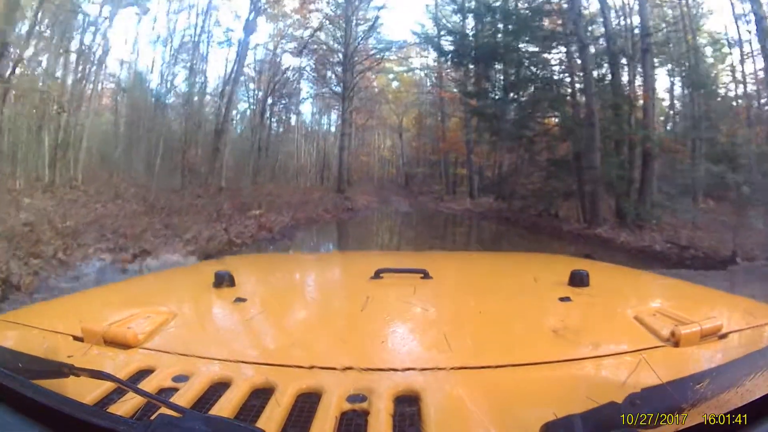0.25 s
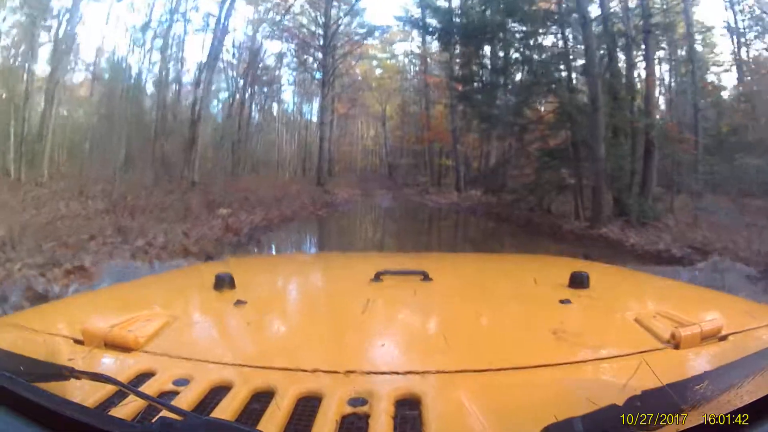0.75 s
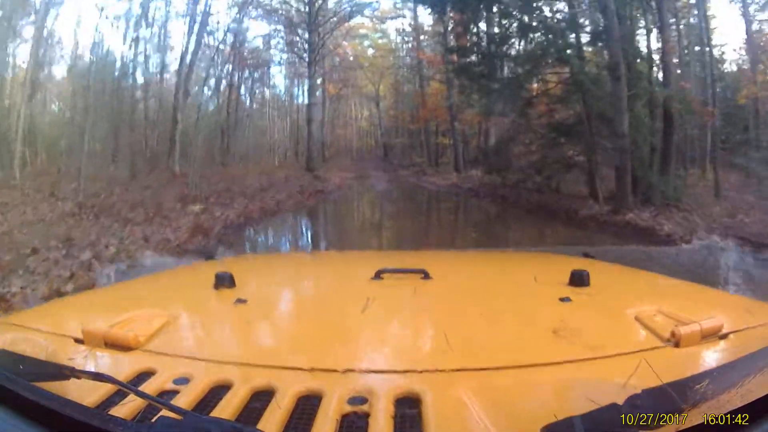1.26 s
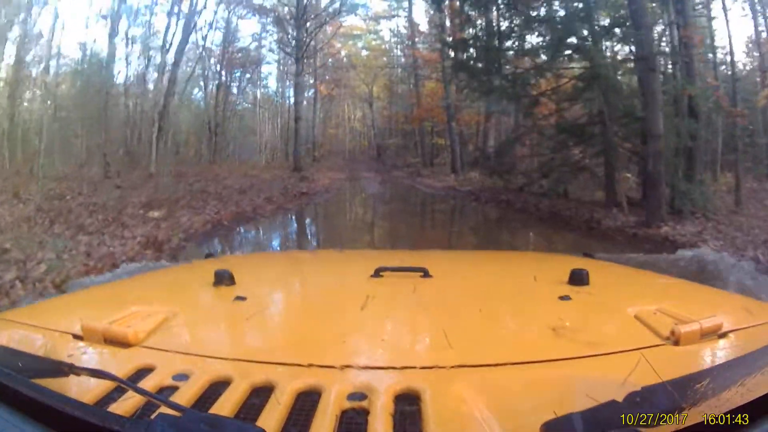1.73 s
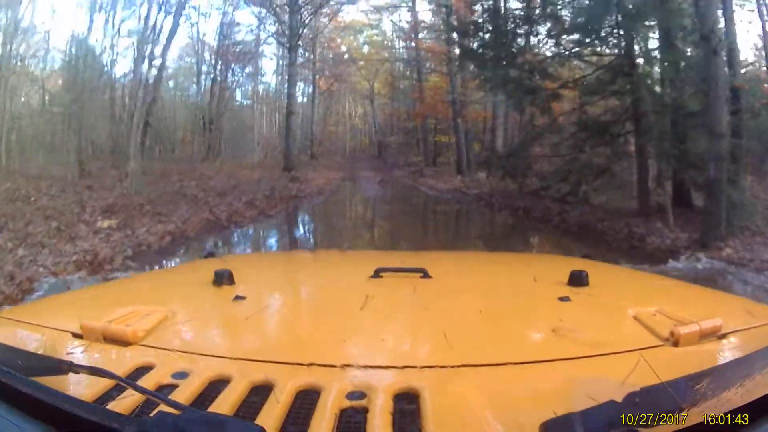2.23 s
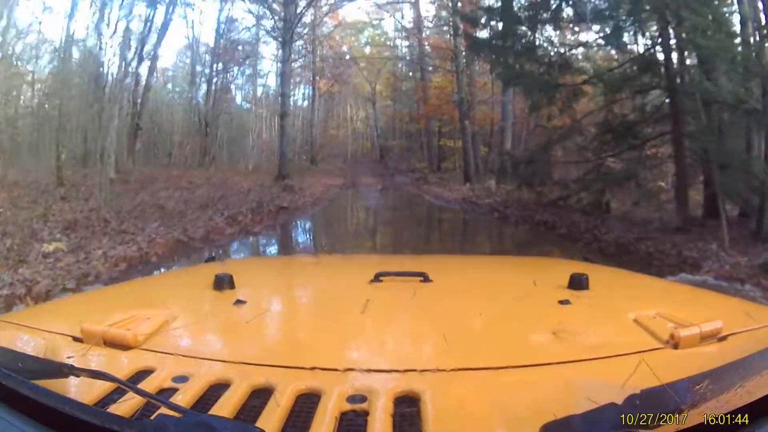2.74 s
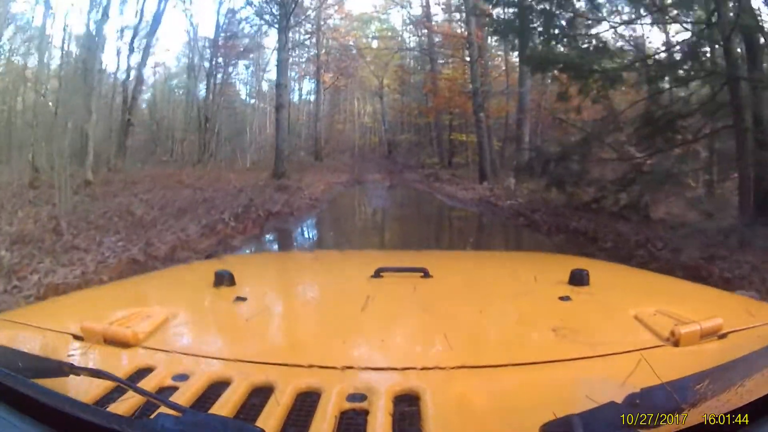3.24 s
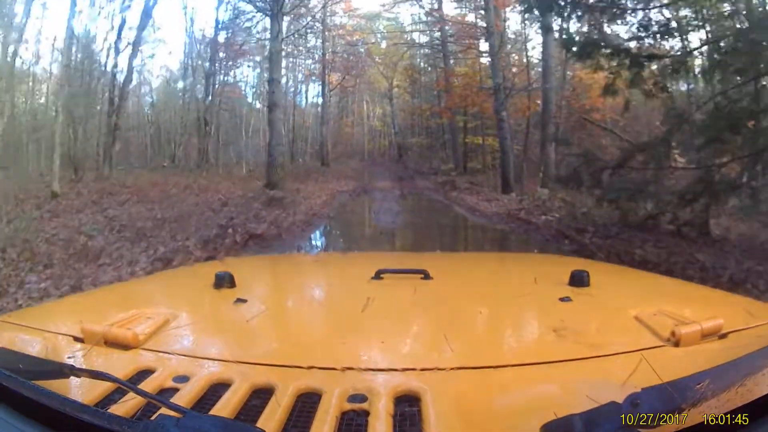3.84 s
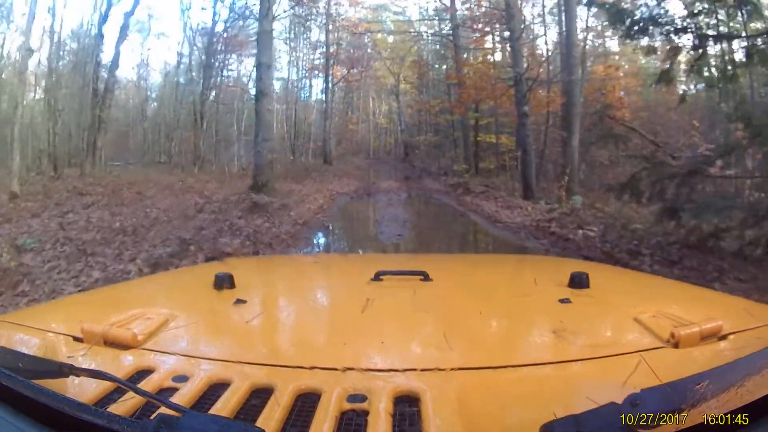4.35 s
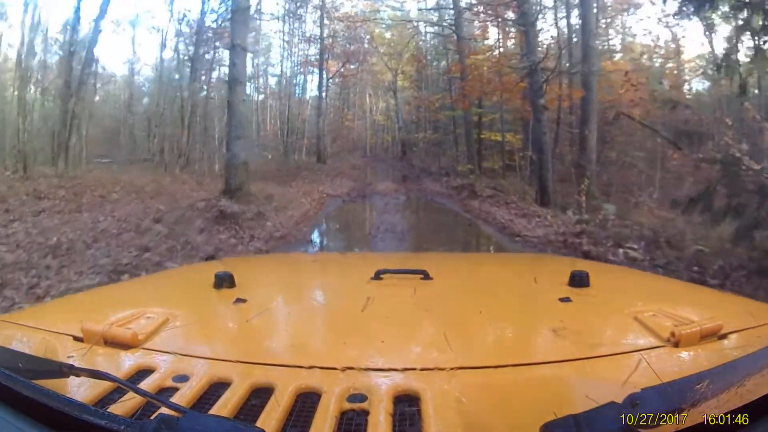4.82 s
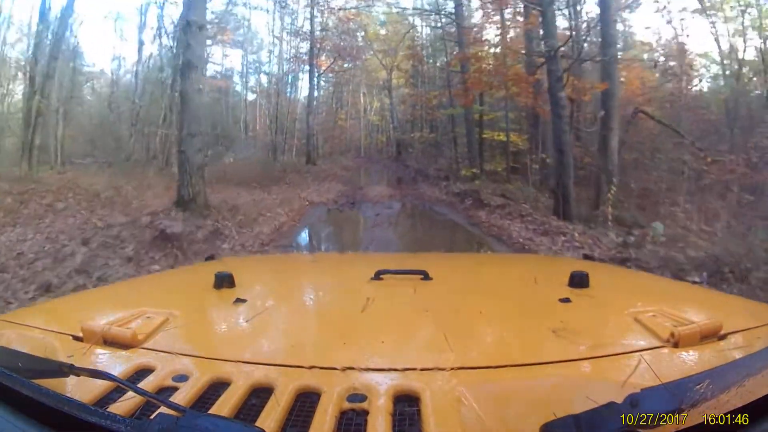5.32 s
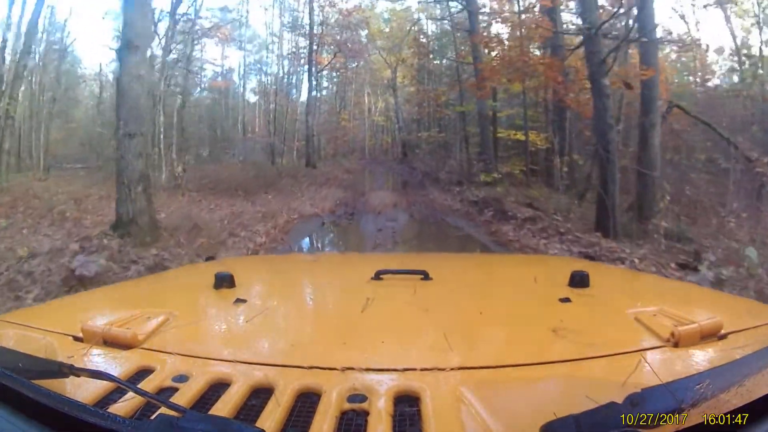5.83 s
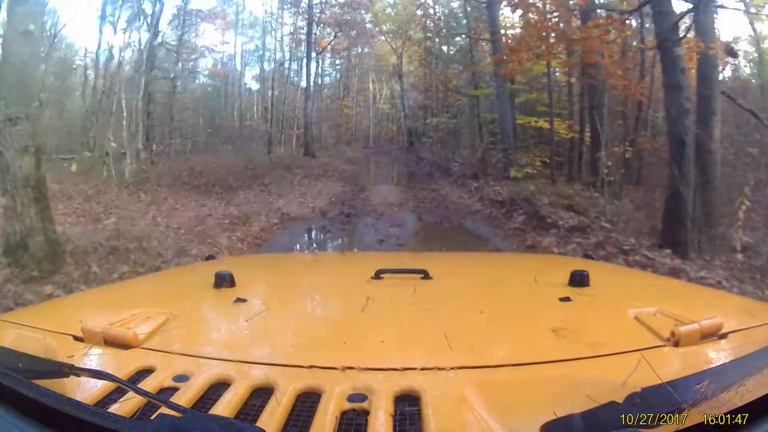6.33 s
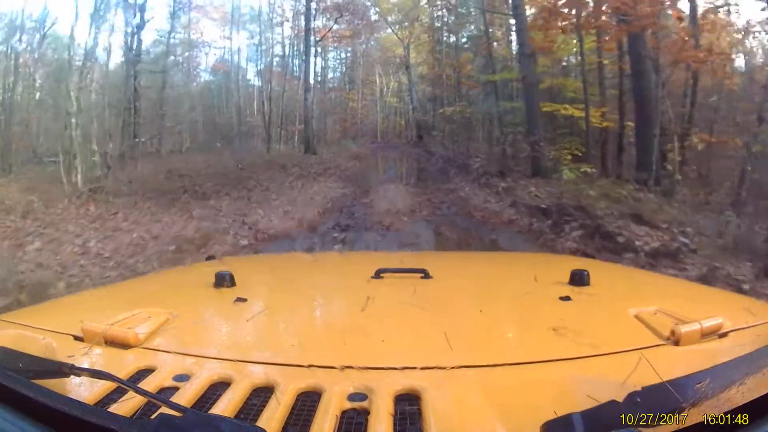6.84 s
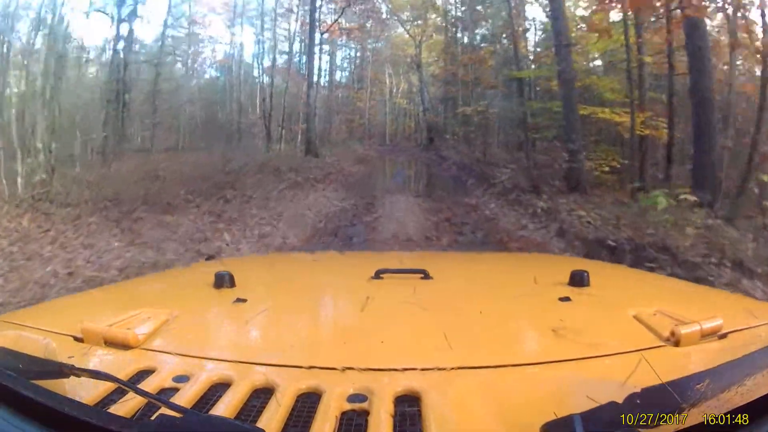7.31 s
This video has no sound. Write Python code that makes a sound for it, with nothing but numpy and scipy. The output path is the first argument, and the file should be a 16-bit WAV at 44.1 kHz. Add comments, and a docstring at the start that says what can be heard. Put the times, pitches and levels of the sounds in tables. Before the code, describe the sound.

An off-road car's engine hums inside the cab while the body shakes and bumps set off close, sharp rattling knocks.

```python
"""Inside an off-road car rolling slowly along a muddy track, the microphone in a small camera hung on
the windscreen. From the start the body shakes, a six-cylinder engine and wet tyres sound through the
cab, and the camera's circuits add hiss and a faint high whine. From 0.2 to 3.4 s ruts rattle the camera
in its mount, right at the microphone. The engine has dropped in pitch by 3.7 s and climbs gently over
smoother ground; from 6.8 s a few more ruts set the camera knocking again."""
import sys
import numpy as np
from scipy import signal
from scipy.fft import rfft, irfft, next_fast_len
from scipy.io import wavfile
from scipy.ndimage import uniform_filter1d

SR = 44100
rng = np.random.default_rng(int(sys.argv[2]) if len(sys.argv) > 2 else 0)


def digitize_waveform(pressure):
    """Quantize a signal to 16-bit integers and store it at the path in sys.argv[1].

    Rows of a 2-D input are taken as channels; values are limited to [-1, 1].
    """
    field = np.atleast_2d(pressure).T
    bounded = np.clip(field, -1, 1)
    quanta = np.round(bounded * 32767).astype(np.int16)
    wavfile.write(sys.argv[1], SR, quanta)


N = 333837
T = np.arange(N) / SR


def gain_of(db):
    """Decibels to amplitude."""
    return 10 ** (np.asarray(db) / 20)


def unit_rms(x):
    """Scales to rms 1."""
    return x / np.sqrt(np.mean(x ** 2) + 1e-20)


def column(rows, index):
    """One column of a timed table, interpolated at every sample."""
    rows = np.array(rows)
    return np.interp(T, rows[:, 0], rows[:, index])


def coloured(spectrum):
    """Noise of rms 1, shaped by points of (frequency [Hz], relative level [dB])."""
    size = next_fast_len(N)
    hz, db = np.transpose(spectrum)
    bins_hz = np.fft.rfftfreq(size, 1 / SR)
    shape_db = np.interp(np.log(bins_hz + 1), np.log(hz + 1), db, left=-90, right=-90)
    return unit_rms(irfft(rfft(rng.standard_normal(size)) * gain_of(shape_db), size)[:N])


def drift(rate_hz):
    """Random wander of rms 1, mostly slower than rate_hz."""
    return coloured([(.2, 0), (rate_hz, -6), (2 * rate_hz, -40)])


def resonate(x, hz, width_hz):
    """A resonance of gain 1: shifts hz (steady or gliding) down to zero, smooths, and shifts back."""
    carrier = np.exp(2j * np.pi * np.cumsum(hz * np.ones(len(x))) / SR)
    pole = np.exp(-np.pi * width_hz / SR)
    return 2 * (carrier * signal.lfilter([1 - pole], [1, -pole], x / carrier)).real


# Ruts under the wheels: (start [s], length [s], shake level [dB], jolt level [dB])
RUTS = [(0.251, 0.29, -24, -26.5), (0.564, 0.19, -19.5, -21), (0.95, 0.091, -21.5, -28.5),
        (1.126, 0.29, -20, -20.5), (1.566, 0.11, -27, -25), (2.004, 0.16, -35, -27),
        (2.202, 0.098, -39, -23), (2.38, 0.12, -36, -26.5), (2.69, 0.14, -21, -28.5),
        (2.92, 0.17, -26.5, -21.5), (3.282, 0.12, -27, -25), (6.786, 0.084, -35, -35.5),
        (7.382, 0.072, -32.5, -32.5), (7.462, 0.18, -35, -23.5)]
# The track between the ruts: (time [s], shake level [dB], jolt level [dB])
TRACK = [(0, -26, -37.5), (.86, -53.5, -55.5), (1.92, -25.5, -36), (2.6, -29, -40), (3.6, -28.5, -39.5),
         (4.2, -31.5, -48.5), (4.75, -37, -47), (5.1, -32.5, -47), (5.8, -31.5, -44), (6.5, -41.5, -48.5),
         (6.78, -26.5, -44), (7.15, -29.5, -42), (7.57, -30, -44)]
SHAKE, JOLT = 1, 2
RISE_DB_PER_S, SETTLE_DB_PER_S = 501, {SHAKE: 124, JOLT: 251}


def ride_db(motion):
    """Level of SHAKE or JOLT: at each rut it rises fast, holds, and settles back to that of the track."""
    t = T[::64]
    power = gain_of(column(TRACK, motion)[::64]) ** 2
    for start, length, *levels_db in RUTS:
        before_db = RISE_DB_PER_S * np.maximum(start - t, 0)
        after_db = SETTLE_DB_PER_S[motion] * np.maximum(t - start - length, 0)
        power += gain_of(levels_db[motion - 1] - before_db - after_db) ** 2
    return np.interp(T, t, 10 * np.log10(power))


# Rumble in the windscreen, just behind the microphone: (frequency [Hz], relative level [dB])
GLASS_RUMBLE = [(20, -19), (45, -1.5), (64, -3), (170, -5.5), (226, -20), (316, -31.5), (500, -26),
                (700, -44)]


def body_shake():
    """The mount swings; jolts drive it against its stops, slowing it, adding its octave and a rumble."""
    jolt_db, shake_db = ride_db(JOLT), ride_db(SHAKE)
    against_stops = np.clip((jolt_db + 45) / 15, 0, 1)
    swing_hz = (18.0 - 2.5 * against_stops) * (1 + 0.0472 * drift(3.14))
    phase = 2 * np.pi * np.cumsum(swing_hz) / SR
    swing = gain_of(shake_db + 2.3 * drift(10.2)) * np.sin(phase)
    octave = gain_of(jolt_db - 1.5) * np.cos(2 * phase)
    rumble = gain_of(jolt_db - 1.0) * coloured(GLASS_RUMBLE)
    return np.sqrt(2) * (swing + octave) + rumble


# The engine, ahead of the cab: (time [s], crank speed [turns/s], load level [dB])
ENGINE = [(0, 41.5, -52.5), (1.5, 39, -49.5), (1.9, 42.7, -49), (2.4, 41.3, -53.5), (3.7, 26.2, -57),
          (4.06, 27.6, -50), (4.57, 28.6, -53), (5.18, 30, -48.5), (5.7, 31.4, -53), (6.18, 32.5, -56),
          (6.76, 33.3, -55), (7.57, 32.1, -55)]
# Its tones at the windscreen: (order [multiple of crank speed], relative level [dB])
CRANK_ORDERS = [(3, 1), (4, -2), (5, -1), (5.5, -6), (6, 1), (7, -7), (8.5, -9), (9, -9.5)]
BOOM_HZ, GEAR_TEETH, WHIRR_HZ = 178, (62.5, 56.), 1830


def engine():
    """Crank orders hum; the cab booms as the sixth crosses its resonance. Two gear meshes whirr."""
    speed = column(ENGINE, index=1) * (1 + 0.001 * drift(1.1))
    load = gain_of(column(ENGINE, index=2))
    turns = np.cumsum(speed) / SR
    hum = np.zeros(N)
    for order, db in CRANK_ORDERS:
        boom = 1 + 5.75 * (order == 6) / (1 + ((order * speed - BOOM_HZ) / 7.1) ** 2)
        waver_db = (1.2 if order == 6 else 3.5) * drift(3.74)
        hum += gain_of(db + waver_db) * boom * np.sin(2 * np.pi * (order * turns + rng.random()))
    whirr = sum(unit_rms(resonate(rng.standard_normal(N), teeth * speed, 32)) for teeth in GEAR_TEETH)
    for _ in range(2):
        whirr = resonate(whirr, WHIRR_HZ, width_hz=220)
    return np.sqrt(2) * load * (hum + gain_of(-19) * whirr)


# Tyres, mud and engine bay, heard from inside the cab: (frequency [Hz], relative level [dB])
CAB_SPECTRUM = [(26, 3.5), (71, -13.5), (126, 2.5), (200, -9.5), (304, -14.5), (430, -18.5), (580, -25.5),
                (740, -33), (1270, -31.5), (1420, -25), (1590, -32), (1800, -33.5), (2290, -48.5),
                (5500, -56)]


def cab_noise():
    """Wet tyre and engine-bay noise, swelling a little; the low part chugs with each engine cycle."""
    level_db = -42 + .6 * drift(3.)
    noise = coloured(CAB_SPECTRUM)
    turns = np.cumsum(column(ENGINE, index=1)) / SR
    chug = .5 * np.sin(np.pi * turns + drift(2.))  # one cycle in two turns
    return gain_of(level_db) * (noise + chug * resonate(noise, hz=140, width_hz=120))


def circuits():
    """The camera's own hiss, and a whine whose sign is switched at a steady rate."""
    hiss = gain_of(-66.0) * coloured([(300, 7), (3000, 3.0), (8000, -3.5), (16000, -4.5)])
    switch = np.tanh(8 * np.sin(2 * np.pi * 41.4 * T))
    whine = switch * np.sin(2 * np.pi * 13419.5 * T)
    return hiss + gain_of(-70.5) * whine


KNOCK_SAMPLES = 2600


def ring(modes, chance, spread_db, detune, rise_s):
    """One blow on a set of decaying modes; where it lands alters each mode's share."""
    t = np.arange(KNOCK_SAMPLES)[:, None] / SR
    hz, db, t60 = np.transpose(modes)
    share, tune, sign = chance
    envelopes = gain_of(db + spread_db * share - 60 * t / t60)
    waves = np.sign(sign) * np.sin(2 * np.pi * hz * (1 + detune * tune) * t)
    return (envelopes * waves).sum(1) * (1 - np.exp(-t[:, 0] / rise_s))


# The camera case, around the microphone: (frequency [Hz], relative level [dB], time to fall 60 dB [s])
CASE_MODES = [(880.6, -14.5, 0.034), (1092, 0.5, 0.0092), (1406, 5.5, 0.008), (1706, -2.5, 0.012),
              (1930, -16.5, 0.0083), (2130, -18.5, 0.018), (2480, -23, 0.018), (2970, -32.5, 0.014),
              (3340, -38, 0.013), (3753, -3.5, 0.02), (4210, -8, 0.012), (4560, -9, 0.016)]
# The mount and glass, next to it: (frequency [Hz], relative level [dB], time to fall 60 dB [s])
MOUNT_MODES = [(140.7, -1, 0.059), (173, -1.5, 0.072), (311, -5.5, 0.037), (479, -13, 0.044),
               (562, -22.5, 0.043), (690, -21, 0.028)]
CHANCE_SHAPE = (3, len(CASE_MODES) + len(MOUNT_MODES) + 1)  # last column varies the chatter's brightness
BRIGHT_HZ, BUZZ_S, CRACK_S = 3550, 0.0049, .0014
HARD_DB, SIDE_MODES = -18, (0, 1, 3)  # harder ticks lose share in these modes, the buzz and the cluster
CONTACTS, CLUSTER_S, LEAD_S = 3, .008, .005  # light contacts can start LEAD_S ahead of the blow


def knock(tick_db, thud_db, bright_db, chance):
    """The case ticks amid lighter contacts, loose parts buzz, the mount thuds; hard blows also crack."""
    t = np.arange(KNOCK_SAMPLES) / SR
    tight_db = -0.99 * max(tick_db - HARD_DB, 0)
    case = [(hz, db + bright_db * (hz > BRIGHT_HZ) + tight_db * (k in SIDE_MODES), t60)
            for k, (hz, db, t60) in enumerate(CASE_MODES)]
    spread_db = np.clip(-tick_db / 9, .8, 2.6)  # hard blows land alike
    rise_s = np.clip(-tick_db / 12, .9, 1.8) / 1000
    tick = ring(case, chance[:, :len(case)], spread_db, detune=.012, rise_s=rise_s)
    thud = ring(MOUNT_MODES, chance[:, len(case):-1], spread_db=2., detune=.03, rise_s=.0015)
    crack = resonate(rng.standard_normal(len(t)) * np.exp(-t / CRACK_S), hz=4600, width_hz=2600)
    buzz = signal.fftconvolve(tick, rng.standard_normal(len(t)) * np.exp(-t / BUZZ_S))[:len(t)]
    tick = tick / abs(tick).max() + gain_of(-11 + tight_db) * buzz / abs(buzz).max()
    tick += gain_of(-13 + 2.8 * tick_db) * crack
    cluster = sum((2 * size - 1) * np.interp(t - CLUSTER_S * delay, t, tick, left=0)
                  for delay, size in rng.random((2, CONTACTS)).T)
    thud_db = min(thud_db, tick_db + 13)  # a light tick cannot thud much louder than itself
    blow = gain_of(tick_db) * tick + gain_of(thud_db) * thud / abs(thud).max()
    return np.interp(t - LEAD_S, t, blow, left=0) + gain_of(tick_db - 9 + tight_db) * cluster


CLEAR_S, CHATTER_KINDS = .015, 10  # span kept clear around a main knock's onset; different small knocks


def chatter():
    """Small knocks of the camera on uneven rebounds, likelier and stronger the harder the jolting."""
    jolt_db = ride_db(JOLT)
    rebound_hz = 88 * np.exp(.6 * drift(40.))
    rebounds = np.diff(np.cumsum(rebound_hz) / SR // 1, prepend=0) > 0
    main_onsets = np.zeros(N)
    main_onsets[(np.array(MAIN_KNOCKS)[:, 0] * SR).astype(int) - round(LEAD_S * SR)] = 1
    free = uniform_filter1d(main_onsets, round(CLEAR_S * SR)) < 1e-6
    touches = rng.random(N) < np.clip((jolt_db + 41) / 5, 0, 1)
    strength = gain_of(1.194 * jolt_db + 22.5 + 3.86 * rng.standard_normal(N))
    impulses = strength * rebounds * touches * free
    kind = rng.integers(0, CHATTER_KINDS, N)
    out = np.zeros(N)
    for k, chance in enumerate(rng.standard_normal((CHATTER_KINDS, *CHANCE_SHAPE))):
        small_knock = knock(-27.5, -31.5, -31 + 6.0 * chance[0, -1], chance)
        out += signal.oaconvolve(impulses * (kind == k), small_knock)[:N]
    return out


# Knocks right at the microphone: (time [s], tick level [dB], thud level [dB], bright-mode gain [dB])
MAIN_KNOCKS = [(0.2399, -28, -20, -40.0), (0.2873, -32.5, -22, -27), (0.304, -26.5, -24, -24),
               (0.3285, -30.5, -27.5, -26), (0.356, -27.5, -27, -19), (0.415, -34, -37, -19),
               (0.4776, -31.5, -27, -43), (0.548, -22.5, -20, -33.0), (0.562, -21.5, -24, -41),
               (0.591, -4.0, -11.5, -27), (0.612, -13, -26, -28), (0.6215, -15, -15.5, -34),
               (0.653, -6.5, -23, -27), (0.6755, -14.5, -11, -30), (0.683, -20, -20, -30),
               (0.72, -12, -16, -33), (0.7388, -18, -19.5, -28), (0.7493, -21.5, -21.5, -36),
               (0.9495, -27, -26.5, -34), (0.9722, -33, -31, -30), (0.9862, -35, -33, -30),
               (0.999, -28.5, -33, -25), (1.014, -37, -34, -30), (1.1245, -28, -25, -21),
               (1.1556, -20.5, -27, -26), (1.1721, -18.5, -12.5, -23), (1.1874, -16.5, -17.5, -34),
               (1.2181, -13.0, -13.5, -32), (1.2415, -12, -14.5, -29.5), (1.25, -10, -13, -34.5),
               (1.2846, -15.5, -29, -30), (1.3, -18, -19, -32), (1.3363, -20.5, -17.5, -25),
               (1.3664, -11.5, -16, -24.5), (1.4002, -26, -42, -25), (1.421, -17.5, -15.5, -23),
               (1.4285, -11, -14, -35), (1.579, -26.5, -20.5, -44), (1.617, -20.5, -19.5, -30),
               (1.6709, -33, -27, -6.5), (1.9205, -34, -33, -18), (2.0002, -27.5, -22.5, -38),
               (2.028, -27.5, -25.5, -18), (2.05, -27.5, -20, -23), (2.067, -16, -20, -28),
               (2.124, -18.5, -17, -20), (2.1773, -28.5, -29, -35), (2.2132, -23, -24, -31),
               (2.2274, -11, -10, -32), (2.244, -11.5, -27, -33.0), (2.2629, -18, -14.5, -34),
               (2.2896, -23, -15, -6), (2.3842, -26.5, -39, -21.5), (2.4205, -23.5, -42, -33),
               (2.4463, -23.5, -19, -28), (2.4612, -20, -22, -35), (2.7291, -37, -29.5, -30),
               (2.7499, -40, -34, -30), (2.7836, -27.5, -23.5, -29), (2.808, -39, -32, -28),
               (2.925, -26, -22, -17), (2.9509, -25.5, -24, -37.0), (2.983, -3.5, -12.5, -25.5),
               (3.0066, -14, -17.5, -33), (3.0166, -20.5, -36, -37), (3.0499, -7.5, -20, -27.5),
               (3.0703, -19, -20, -37), (3.0863, -29, -32, -25), (3.138, -27.5, -23, -15.5),
               (3.2708, -28.5, -22, -29.5), (3.306, -21, -19.5, -24), (3.3227, -19.5, -26, -34),
               (3.3368, -27, -28, -34.0), (3.3822, -22.5, -19.5, -28), (3.398, -28.5, -19, -25),
               (6.808, -42, -40, -30), (6.835, -42.5, -34, -30), (7.2882, -35, -32.5, -20),
               (7.4108, -33, -39, -22), (7.4245, -30, -40, -15), (7.4785, -20, -18, -25),
               (7.4888, -27, -19.5, -37.0), (7.505, -27, -27, -35), (7.538, -12.5, -11, -32),
               (7.552, -20, -19, -35)]


def main_knocks():
    """The bigger jolts throw the camera against its mount, one blow at a time."""
    out = np.zeros(N + KNOCK_SAMPLES)
    chances = rng.standard_normal((len(MAIN_KNOCKS), *CHANCE_SHAPE))
    for (time_s, *levels_db), chance in zip(MAIN_KNOCKS, chances):
        start = round((time_s - LEAD_S) * SR)
        out[start:start + KNOCK_SAMPLES] += knock(*levels_db, chance)
    return out[:N]


def scene():
    """All that reaches the microphone on the windscreen, in mono."""
    return (main_knocks() + chatter() + body_shake() + engine() + cab_noise())[None]


def record(dry):
    """The camera's input limits any peak that overloads it; then come circuit noise and a treble cut."""
    clipped = np.clip(dry, -.72, .72)
    lowpass = signal.firwin(511, cutoff=15780, window=("kaiser", 9), fs=SR)
    return signal.oaconvolve(clipped + circuits(), lowpass[None], "same")


dry = scene()
out = record(dry)
digitize_waveform(out)
```